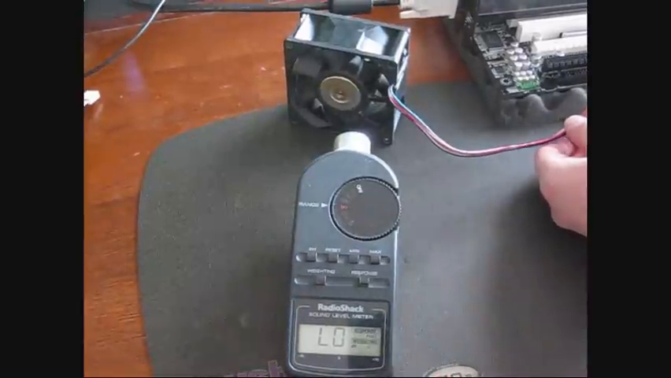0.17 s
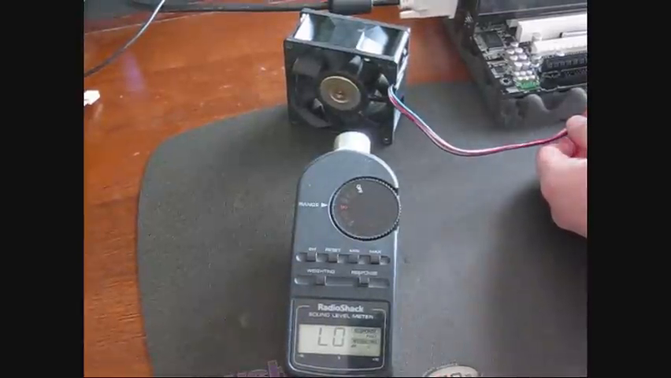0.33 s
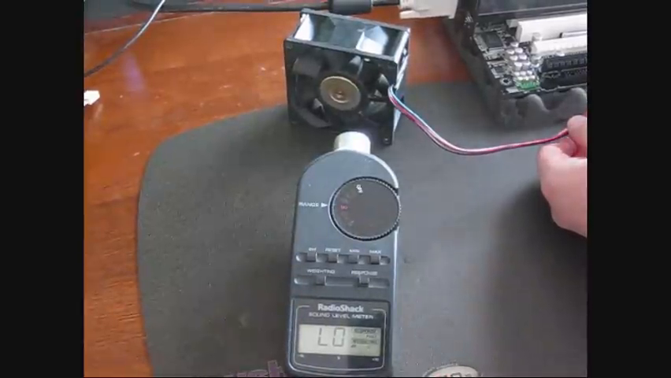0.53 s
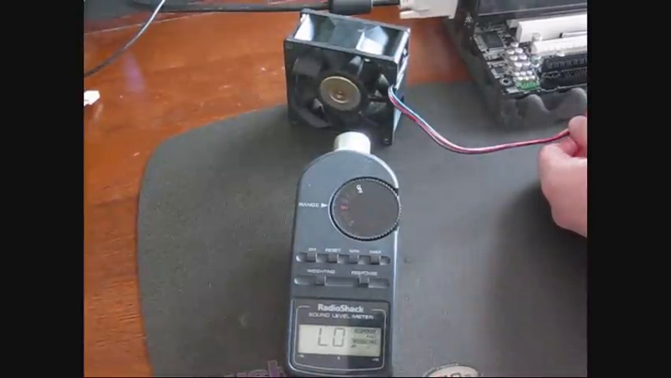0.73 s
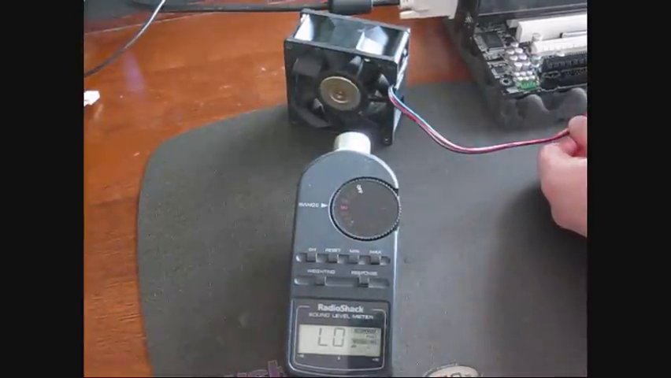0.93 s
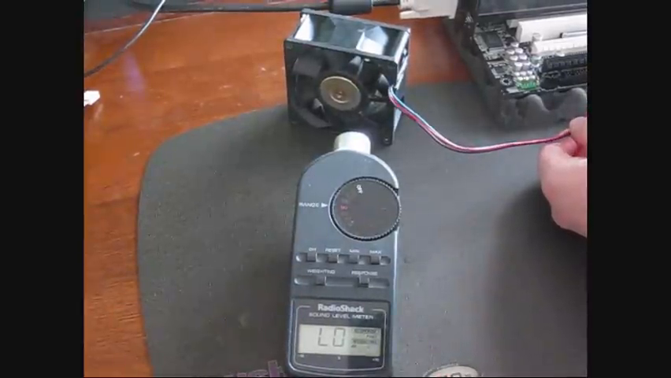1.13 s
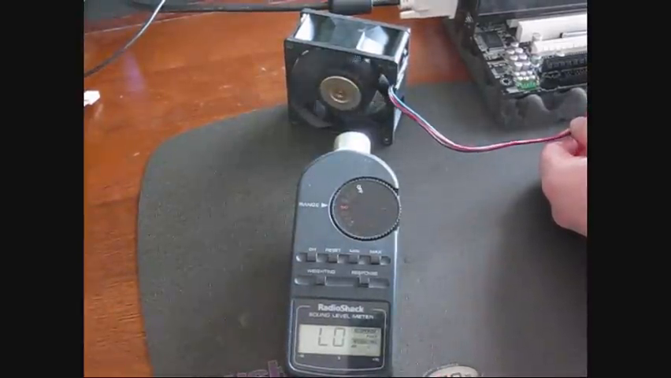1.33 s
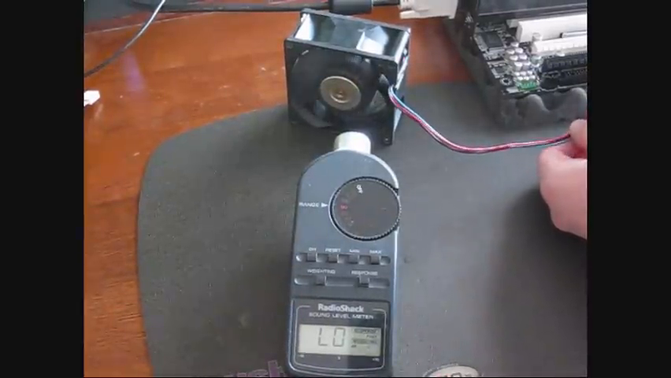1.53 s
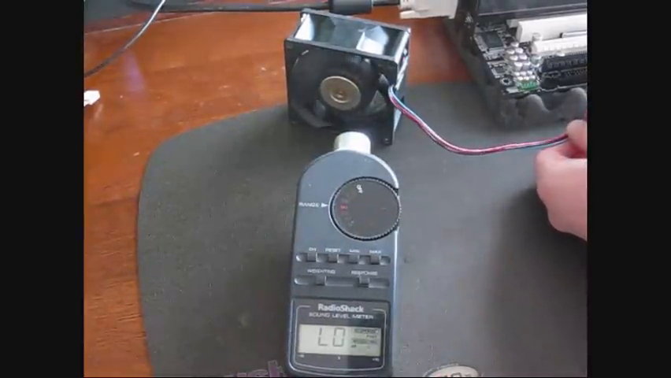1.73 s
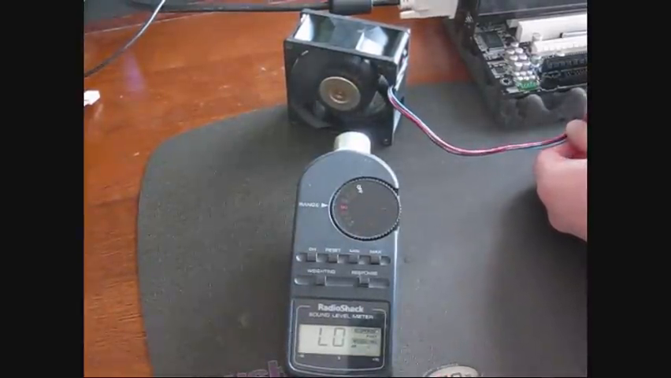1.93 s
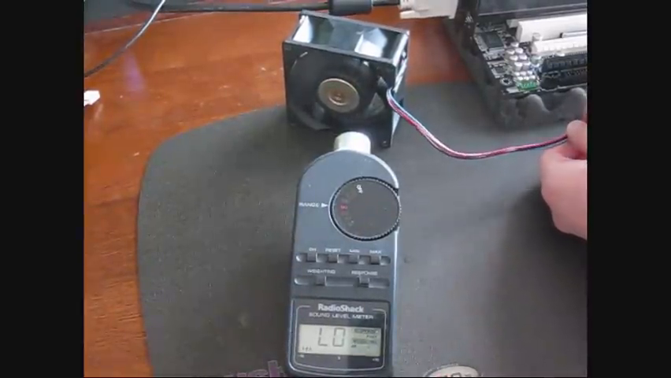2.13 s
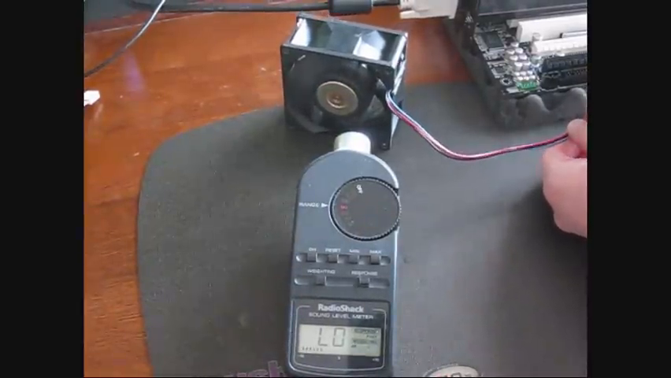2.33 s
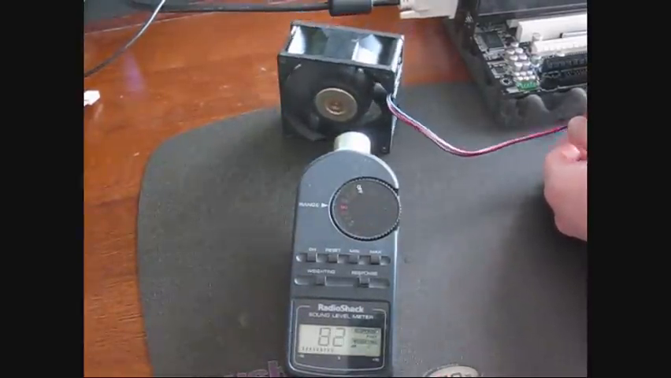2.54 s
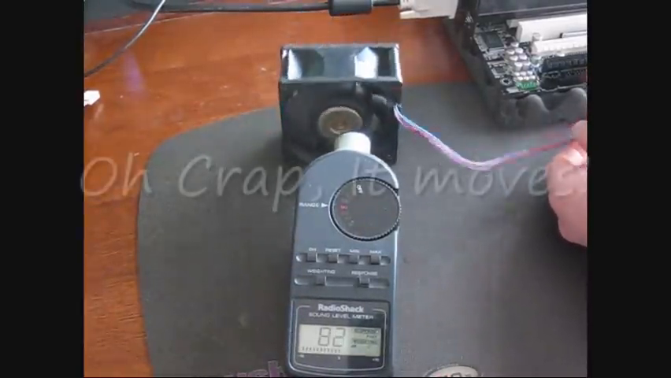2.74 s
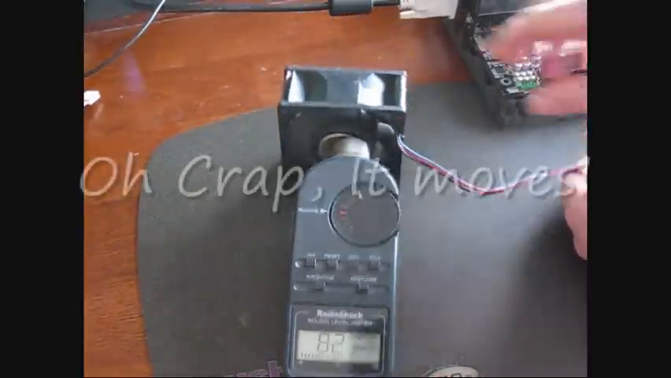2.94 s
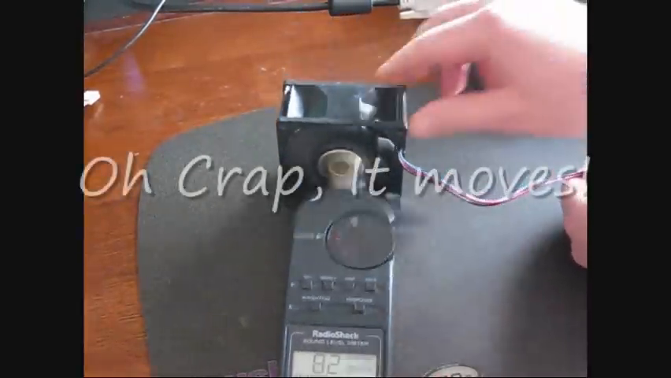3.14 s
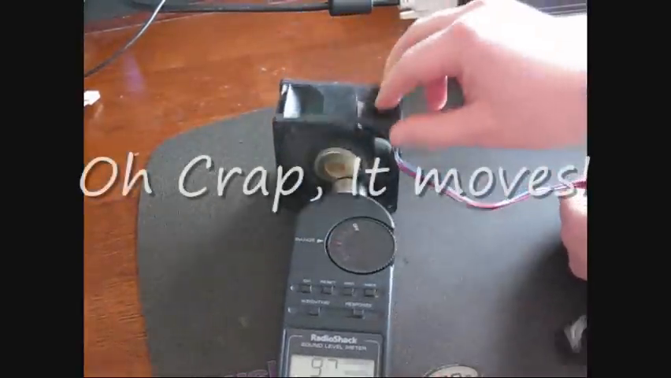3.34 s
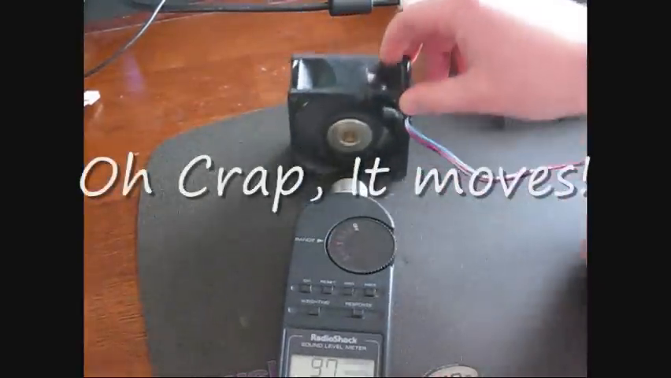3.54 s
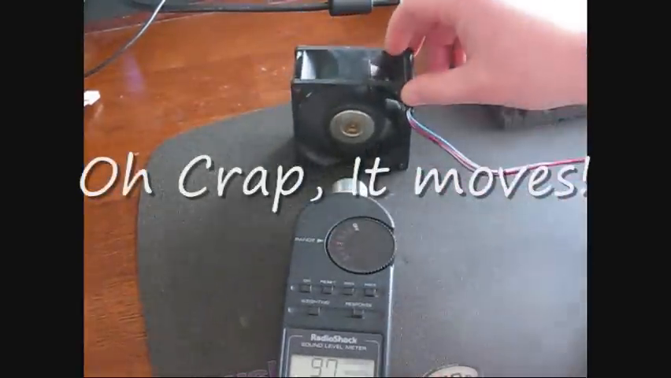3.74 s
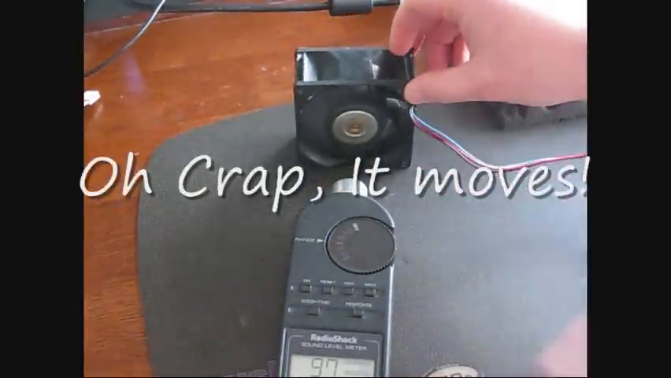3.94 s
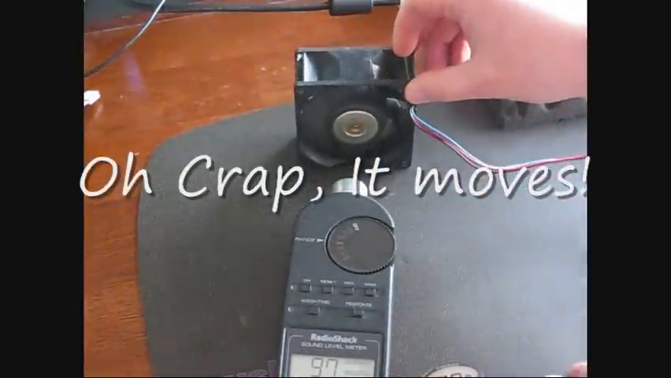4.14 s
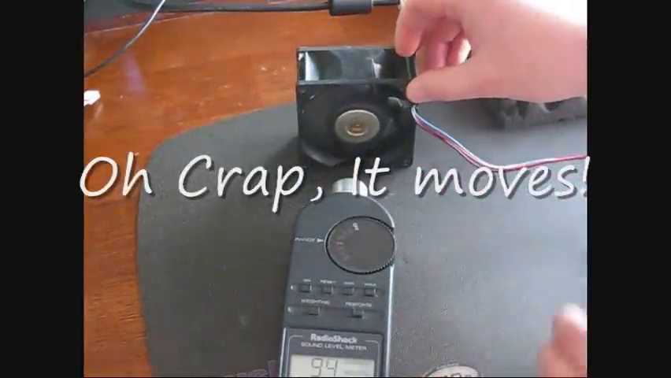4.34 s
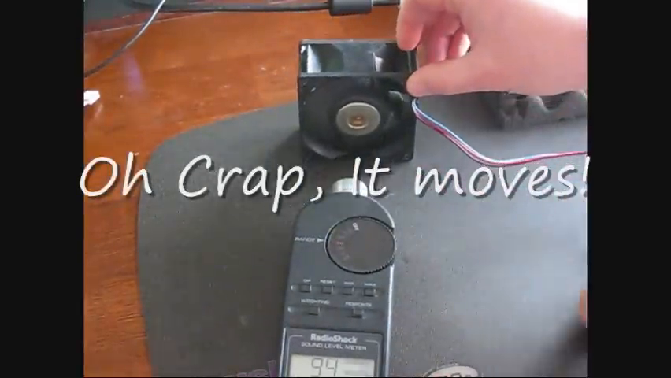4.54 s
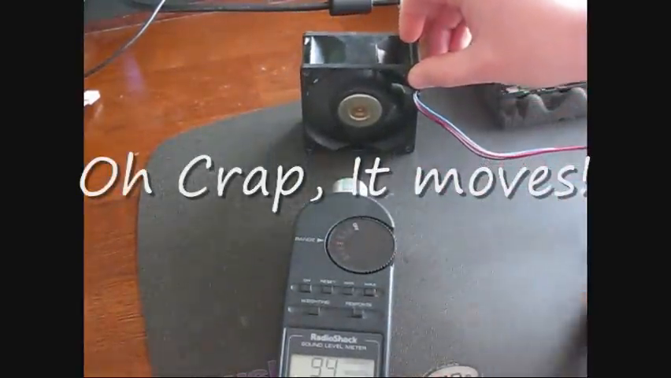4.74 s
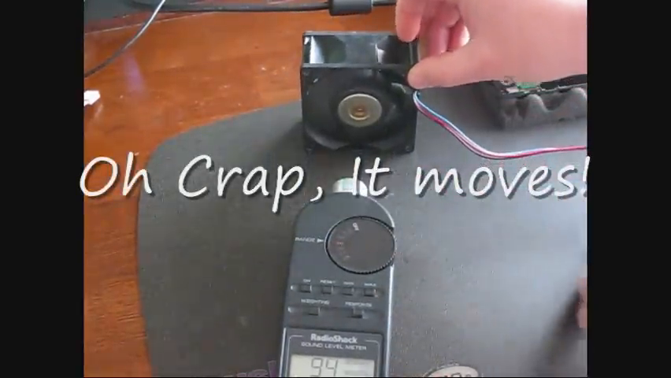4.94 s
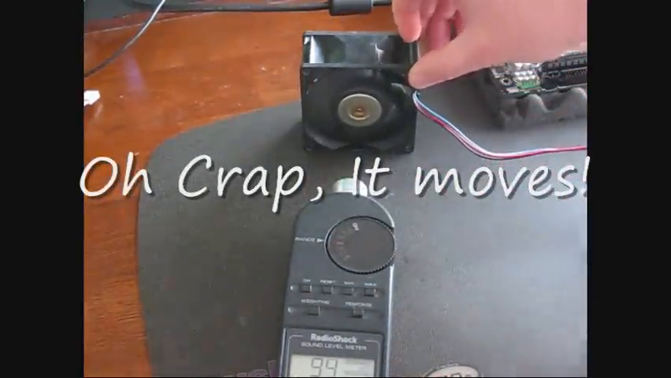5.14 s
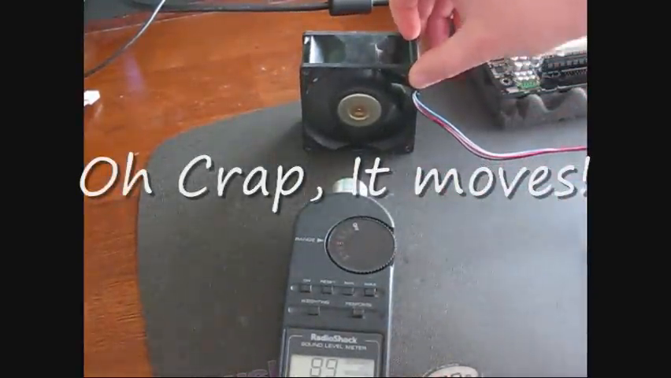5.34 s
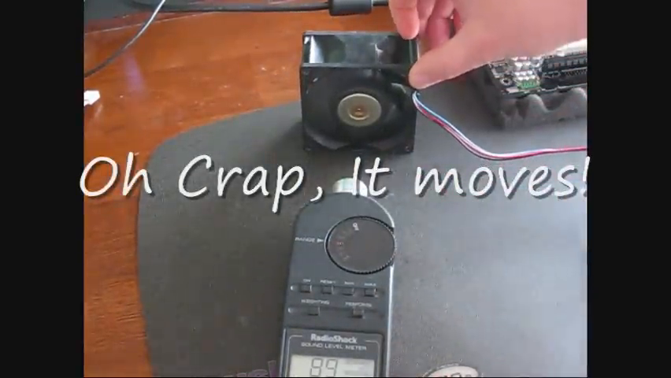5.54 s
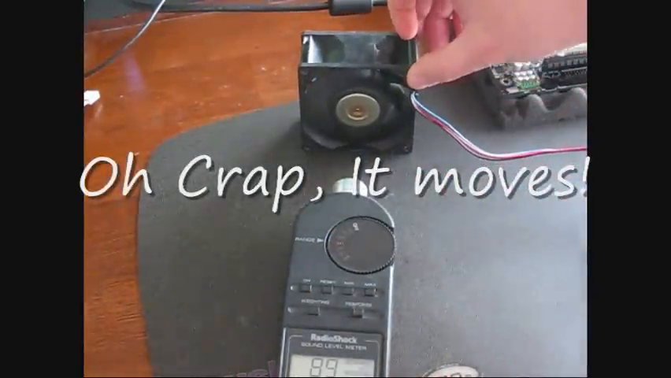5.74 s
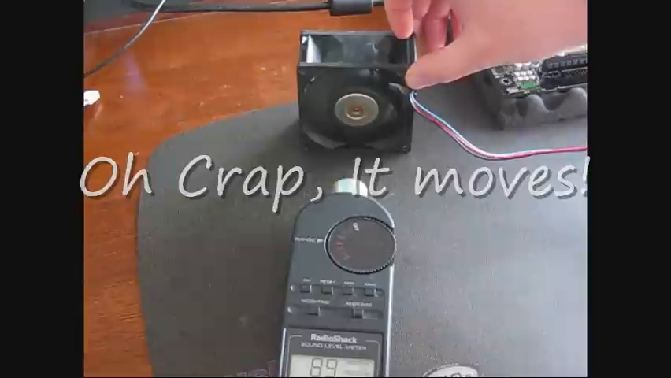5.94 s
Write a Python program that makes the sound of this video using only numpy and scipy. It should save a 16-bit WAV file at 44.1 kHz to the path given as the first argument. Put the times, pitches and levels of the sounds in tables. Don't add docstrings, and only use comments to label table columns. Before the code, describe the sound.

Small computer fan whirs up from near silence to a piercing whine, knocks sharply on a plastic case, then screams on steadily.

```python
import sys
import numpy as np
from scipy import signal
from scipy.fft import rfft, irfft, next_fast_len
from scipy.io import wavfile

SR = 44100
rng = np.random.default_rng(int(sys.argv[2]) if len(sys.argv) > 2 else 0)


def persist_wave(psi):
    counts = np.round(np.clip(psi, -1, 1) * 32767).astype(np.int16)
    wavfile.write(sys.argv[1], SR, np.atleast_2d(counts).T)


def volts_from_db(level):
    exponent = np.asarray(level, float) / 20
    return 10 ** exponent


N = 264159

TOP_REV_S = 99.0
# centre_hz, width_hz, gain_db
ROOM_SWELLS = [(524, 76, 8), (624, 87, -4.5), (673, 19, 4.5), (1030, 90, -5), (1195, 210, 3.5),
               (1987, 90, 5), (2240, 270, -5.5), (2556, 66, 7), (2660, 28, 7.5), (2970, 80, 7.5),
               (3310, 120, 6)]
# time_s, level_db
AXIS_FACING = [
    (3.3, -8),
    (3.7, 0),
]
# time_s, air_db, blade_tones_db
INLET_CHOKE = [
    (2.7, 0, -0.5),
    (3.0, 0.4, -2),
    (3.2, 2, -2.5),
    (3.28, -0.3, -10),
    (3.35, -0.5, -11),
    (3.43, 3, -.6),
    (3.5, -0.6, 0.5),
    (3.62, 0.5, -0.7),
    (3.8, 0, -1.5),
]


def rms_one(x):
    return x / np.sqrt(np.mean(x ** 2) + 1e-20)


def in_time(rows):
    s, *columns = np.transpose(rows)
    return [np.interp(np.arange(N) / SR, s, c) for c in columns]


def decibels(share):
    return 20 * np.log10(np.maximum(share, .01))


def drift(rate_hz):
    r = np.exp(-80 * np.pi * rate_hz / SR)
    coarse = rng.standard_normal(N // 40 + 2002)
    slow = signal.lfilter([1], [1, -2 * r, r * r], coarse)[2000:]
    return np.interp(np.arange(N) / 40, np.arange(len(slow)), rms_one(slow - slow.mean()))


def clicks_at(seconds, sizes):
    out = np.zeros(N)
    np.add.at(out, (np.asarray(seconds) * SR).astype(int), sizes)
    return out


def ring(clicks, hz, t60_s):
    r = volts_from_db(-60 / (t60_s * SR))
    w = 2 * np.pi * hz / SR
    return signal.lfilter([0, np.sin(w)], [1, -2 * r * np.cos(w), r * r], clicks + 1e-18)


def band_pass(x, low_hz, high_hz):
    sos = signal.butter(2, [low_hz, min(high_hz, .45 * SR)], "band", fs=SR, output="sos")
    return signal.sosfilt(sos, x)


def banded_noise(spectrum, tilt_db_per_octave, patchy_db):
    out = np.zeros(N)
    together = drift(6)
    edges_hz = 20 * 2 ** np.arange(0, 10.1, .5)
    hz, db = np.transpose(spectrum)
    bins_hz = np.arange(1, N // 2 + 2) * SR / N
    colour = volts_from_db(np.interp(np.log(bins_hz), np.log(hz), db))
    noise = irfft(rfft(rng.standard_normal((2, N))) * colour, N)
    for k, (low, high) in enumerate(zip(edges_hz, edges_hz[1:])):
        sos = signal.butter(2, [low, high], "band", fs=SR, output="sos")
        band = signal.sosfilt(sos, noise[k % 2])
        tilt_db = tilt_db_per_octave * np.log2(max(low, 300) / 4200)
        flicker_db = patchy_db * (0.23 * together + drift(11))
        out = out + band * volts_from_db(tilt_db + flicker_db)
    return out


def swell(hz, resonances):
    return sum(db / (1 + (2 * (hz - top_hz) / width) ** 2) for top_hz, width, db in resonances)


def room():
    # freq_hz, density_db_per_hz
    floor_spectrum = [(30, -5), (100, -4.5), (250, 0), (1000, -3.5), (2000, -3), (3600, -9), (4700, -4),
                      (5600, -10), (7000, -0.5), (9000, -1), (10000, -12.5), (12000, -13), (14000, -27),
                      (15500, -25)]
    # freq_hz, rms_db
    machine_tones = [(247.6, -59), (985.1, -63.5), (1265, -62.5), (2719, -67), (6002, -60), (9001, -77),
                     (9362, -78), (15735, -85)]
    # start_s, peak_db,
    # pitch_hz, t60_s
    dull_bumps = [(.051, -37.5, 397, 0.14), (.052, -38, 600, .04), (1.388, -37, 1280, 0.037),
                  (1.388, -36, 1580, .06), (2.988, -34, 70, .05), (3.107, -37, 150, .05),
                  (3.213, -28, 90, 0.036), (3.228, -33, 180, .04), (1.481, -41, 130, 0.12),
                  (1.56, -38, 258, .12), (1.487, -37, 250, .1), (1.53, -39, 250, .1),
                  (2.76, -31.5, 197, 0.14), (2.882, -34, 200, 0.12), (3.049, -29, 207, 0.087),
                  (3.311, -35, 129, 0.19), (3.345, -43, 60, .05), (3.42, -35, 130, 0.092),
                  (3.522, -34, 152, 0.12), (3.801, -29, 394, 0.12), (3.615, -33, 60, .05)]
    t = np.arange(N) / SR
    floor = volts_from_db(-41.5) * rms_one(banded_noise(floor_spectrum, 0, patchy_db=0.55))
    hum = sum(np.sqrt(2) * volts_from_db(db + 2.0 * drift(4.8)) * np.sin(2 * np.pi * hz * t)
              for hz, db in machine_tones)
    bumps = sum(ring(clicks_at([s], volts_from_db(db)), hz, t60_s) for s, db, hz, t60_s in dull_bumps)
    tick_s = np.arange(.0165, N / SR, 1 / 29.97)
    tick_size = volts_from_db(-31 + rng.normal(0, 1.5, len(tick_s)))
    ticks = band_pass(ring(clicks_at(tick_s, tick_size), 9200, .005), 8300, 10200)
    return floor + hum + bumps + ticks


def contacts():
    # start_s, level_db, brightness_db
    blows = [
        (1.7958, -38, 6),
        (2.9873, -3, 3),
        (3.186, -9.5, -8),
        (3.2126, 4, -5),
        (3.4038, -20, 5),
        (3.427, -22, 8),
        (3.6384, -16, 12),
        (3.6571, -12.5, 5),
    ]
    # start_s, level_db, brightness_db
    raps = [
        (3.1059, -1, -4),
        (3.1128, -17, -3),
        (3.3238, -21, 4),
        (3.376, -24, -6),
    ]
    # start_s, level_db, brightness_db
    scrapes = [
        (1.719, -41, .1),
        (2.996, -19, 0),
        (3.22, -20, -1),
        (3.2271, -7, 1.5),
        (3.243, -26, -4),
        (3.283, -33, 7),
        (3.3026, -27, 0),
        (3.3374, -23, -1.5),
        (3.3444, -17, 2),
        (3.3927, -26, 0),
    ]
    # start_s, level_db, brightness_db
    handling_ticks = [
        (3.364, -14, -4),
        (3.3724, -13, 5),
        (3.415, -17, 1.5),
        (3.5657, -6, -3),
        (3.5927, -4.5, -5),
        (3.6149, -10.5, 3),
    ]
    reach_db = [
        (-7.5, -14, -11.5, 0.2),
        (-12, -8, -0.5, -11),
        (0, 0.7, -3, -14),
        (-0.5, -11, -8.5, -9),
    ]
    rows = []
    for kind, reach in zip((blows, raps, scrapes, handling_ticks), reach_db):
        for s, db, bright_db in kind:
            rows.append((s, *(db + np.add(reach, [bright_db, bright_db, 0, 0]))))
    return np.transpose(rows)


def knocks():
    # freq_hz, level_db, t60_s
    shell_modes = [
        [(8680, 3.5, 0.011), (9100, 4, 0.0094), (9840, -7, 0.0046)],
        [(10960, -3, .007), (11530, 2, 0.016), (12400, 0, 0.0058)],
        [(4150, -6, .012), (4800, 1, .017), (5250, 1, .015), (5900, -3, .01), (6800, 1, .009)],
        [(2646, 3, 0.0094), (3130, -2.5, 0.0078), (3620, 1, .008), (4070, -4.5, 0.0076), (1640, -15.5, 0.016)],
    ]
    s, *groups = contacts()
    gain = duck()[(s * SR).astype(int)]
    out = np.zeros(N)
    for modes, group_db, gain_db in zip(shell_modes, groups, (5.1, 7.4, 2.5, 2.5)):
        size = volts_from_db(group_db + gain_db) / gain
        rattle = signal.lfilter([.08], [1, -np.exp(-1 / (.0016 * SR))], clicks_at(s, size))
        out += volts_from_db(-14) / .08 * rattle * rng.standard_normal(N)
        for hz, db, t60_s in modes:
            blow_s = s + rng.uniform(0, .0006, len(s))
            blow = clicks_at(blow_s, size * volts_from_db(rng.normal(0, 1.5, len(s))))
            out += volts_from_db(db) * ring(blow + rattle * rng.standard_normal(N), hz, t60_s)
    return band_pass(band_pass(out, 1300, 13000), 900, 13000)


def rotor():
    # time_s, extra_rev_per_s
    load = [
        (3.2, 0),
        (3.3, -.36),
        (3.46, -.34),
        (3.6, -.06),
        (3.76, .18),
        (3.95, .3),
        (4.75, .3),
        (5.1, .38),
        (5.99, .45),
    ]
    start_s, rise_s = 1.375, .57
    since_s = np.maximum(np.arange(N) / SR - start_s, 0)
    rev_s = TOP_REV_S * np.tanh(since_s / rise_s) + in_time(load)[0]
    return rev_s / TOP_REV_S, np.cumsum(rev_s) / SR


def motor(turns):
    # time_s, kick_db
    coil_effort = [(1.38, -31), (1.63, -27.5), (1.88, -23.5), (2.3, -29.5), (2.75, -26.5), (3.2, -28.5),
                   (3.45, -39), (3.9, -33), (4.5, -33), (4.85, -39), (5.15, -31.5)]
    # freq_hz, level_db, t60_s
    frame_modes = [(1588, 0, .055), (2778, -10, .03), (3500, -7, .012), (3870, -11, .02), (6000, -16, .02),
                   (11900, -13, .004), (12600, -11, .005)]
    kick_db, = in_time(coil_effort)
    quarter = np.floor(4 * turns - .1)
    kicks = np.diff(quarter, prepend=-1) * volts_from_db(kick_db + rng.standard_normal(N)) * (turns > .2)
    buzz = signal.lfilter([.25], [1, -np.exp(-1 / (0.0011 * SR))], kicks) * rng.standard_normal(N)
    uneven = kicks * np.where(quarter % 2, .05, 1)
    rung = sum(volts_from_db(db) * ring(buzz if hz > 5000 else uneven, hz, t60_s)
               for hz, db, t60_s in frame_modes)
    return band_pass(rung, 850, 16000)


def rushing_air(speed, turns):
    # freq_hz, density_db_per_hz
    air_spectrum = [(30, -51), (100, -25), (200, -18), (400, -11), (750, -8.5), (1250, -1.5), (1900, -5),
                    (3000, -0.5), (4200, 2.5), (6500, 6), (9000, 4), (12000, -7.5), (13600, -16),
                    (15700, -27)]
    # centre_hz, width_hz, level_db
    duct_ring = (3330, 920, -15.5)
    rush_db = -12.5 + 3.2 * decibels(speed) + in_time(INLET_CHOKE)[0]
    tilt = 0.36 + 0.6976 * decibels(speed) + 0.09 * in_time(AXIS_FACING)[0]
    swish = 1 + 0.063 * np.sin(2 * np.pi * 2 * turns)
    air = volts_from_db(rush_db) * np.sqrt(speed) * swish * banded_noise(air_spectrum, tilt, patchy_db=0.5)
    hz, width_hz, db = duct_ring
    ringing = rms_one(ring(air, hz, np.log(1000) / (np.pi * width_hz)))
    return air + volts_from_db(db) * np.std(air) * ringing


def grip():
    return np.interp(np.arange(N) / SR, (3.25, 4.07), [0, 1])


def blade_levels(speed):
    # free_db, held_db, growth_db_per_db
    blade_tones = [(-29.5, -30.5, 2.5), (-26.5, -28, 4.5), (-26, -30, 5.5), (-28.5, -30.5, 4)]
    # time_s, extra_path_m
    hand_path = [(3.46, 0.13), (3.76, 0.12), (4.1, 0.13), (4.43, .122), (4.6, 0.13), (4.76, 0.14),
                 (4.92, 0.13), (5.1, 0.15), (5.99, 0.14)]
    held = grip()
    path_m, = in_time(hand_path)
    choke_db = in_time(INLET_CHOKE)[1]
    for order, (free_db, held_db, growth) in zip((7, 14, 28, 35), blade_tones):
        hz = order * speed * TOP_REV_S
        free = free_db + swell(hz, ROOM_SWELLS)
        echo = np.abs(1 + held * .97 * np.exp(2j * np.pi * hz * path_m / 343))
        standing_db = (1 - held) * free + held * held_db
        yield order, standing_db + 20 * np.log10(echo) + growth * decibels(speed) + choke_db


def whine(speed, turns):
    weak_orders = [1, 2, 3, 4, 8, 10, 11, 12, 17, 18, 19, 20, 21, 22, 31, 32, 42, 49, 56, 70, 84, 98]
    weak_orders_db = [-59, -62, -55, -52, -46, -45, -44, -44, -47, -43, -43, -42, -32, -47, -43, -44, -33,
                      -39, -39, -42, -54, -49]
    # centre_hz, width_hz, gain_db
    desk_swell = (243, 30, 18.4)

    def tone(order, db):
        level = volts_from_db(db + 1.6 * min(order / 16, 1) * drift(14))
        phase = 2 * np.pi * (order * turns + rng.random()) + .18 * drift(9)
        return np.sqrt(2) * level * np.sin(phase)

    out = sum(tone(order, db) for order, db in blade_levels(speed)) * (speed > 0)
    for order, db in zip(weak_orders, weak_orders_db):
        hz = order * speed * TOP_REV_S
        lift_db = swell(hz, [desk_swell]) + swell(hz, ROOM_SWELLS) * (1 - grip())
        beam_db = (order > 40) * in_time(AXIS_FACING)[0]
        growth = 2 if order < 5 else 7
        out += tone(order, db + lift_db + beam_db) * speed ** growth
    return out


def scene():
    speed, turns = rotor()
    mix = room() + knocks() + motor(turns) + rushing_air(speed, turns) + whine(speed, turns)
    return np.tile(mix, (2, 1))


def duck():
    # start_s, pull_db
    hard_pulls = [
        (2.99, 5.9),
        (3.108, 6.3),
        (3.218, 7.5),
        (3.243, 15),
        (3.2824, 6.6),
    ]
    attack_s, release_s, contact_pull_db = 0.012, 0.044, 2.5
    t = np.arange(SR // 4) / SR
    shape = (1 - np.exp(-(t / attack_s) ** 2)) * np.exp(-(t / release_s) ** 2)
    pulls_db = clicks_at(contacts()[0], contact_pull_db) + clicks_at(*np.transpose(hard_pulls))
    return volts_from_db(-signal.fftconvolve(pulls_db, shape)[:N])


def overload(x, limit, high_hz):
    return x + band_pass(np.clip(x, -limit, limit) - x, 140, high_hz)


def band_limit(x):
    return signal.sosfilt(signal.butter(12, 16120, fs=SR, output="sos"), x)


def record(dry):
    line_hz = 15734
    x = overload(dry * duck(), 1.2, 13500)
    size = next_fast_len(N + 64)
    late = np.exp(-2j * np.pi * np.arange(size // 2 + 1) * SR / size / line_hz)
    x = irfft(rfft(x, size) * (1 + late) / 2, size)[:, :N]
    low_pass = signal.ellip(12, .5, 60, 15740, fs=SR, output="sos")
    x = signal.sosfilt(low_pass, overload(x, 1, 14000))
    return band_limit(np.clip(x, -.98, .98))


dry = scene()
out = record(dry)
persist_wave(out)
```